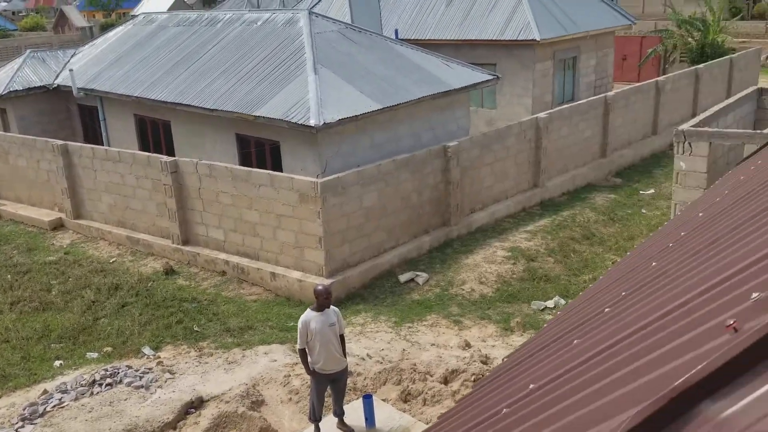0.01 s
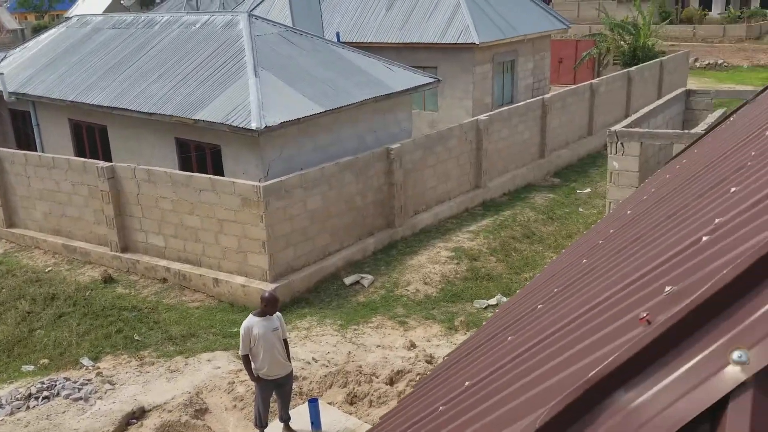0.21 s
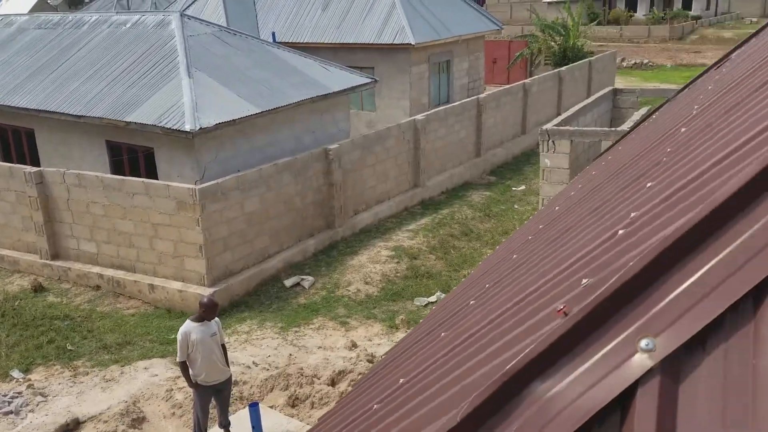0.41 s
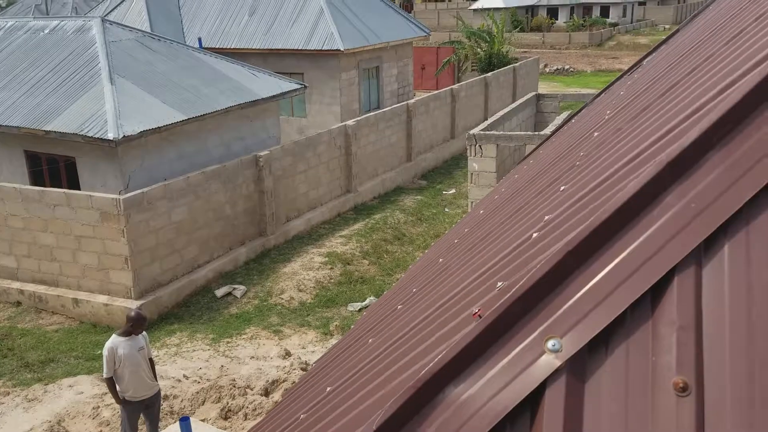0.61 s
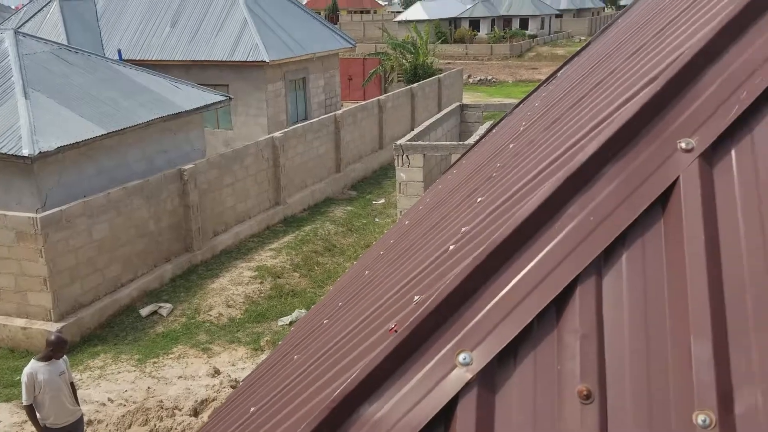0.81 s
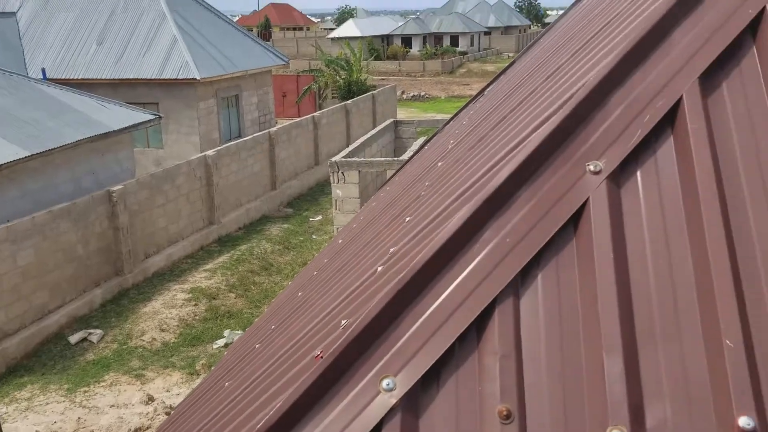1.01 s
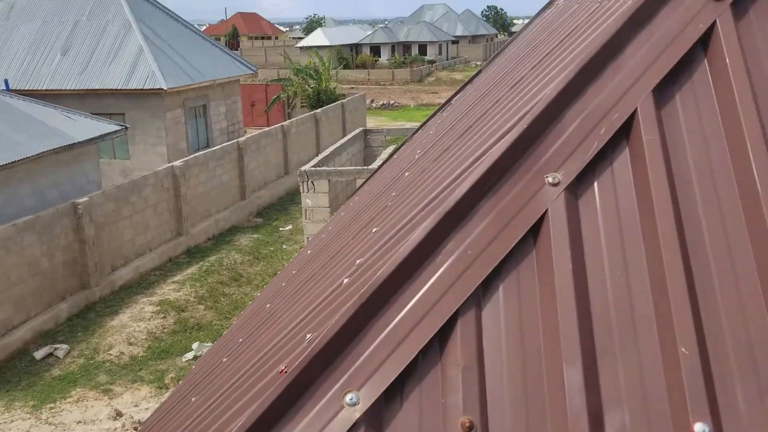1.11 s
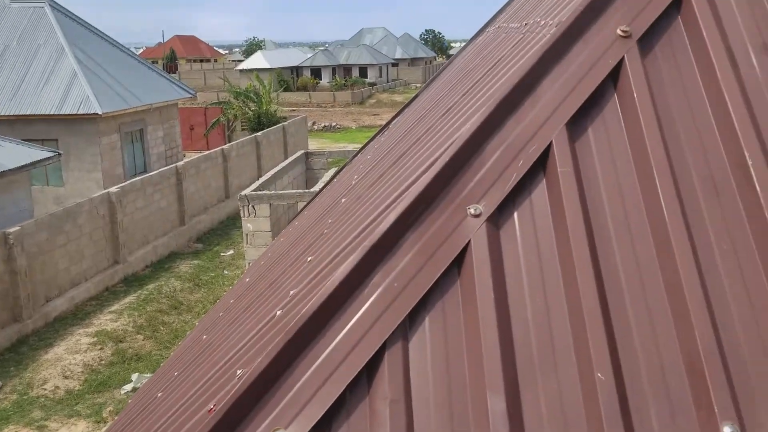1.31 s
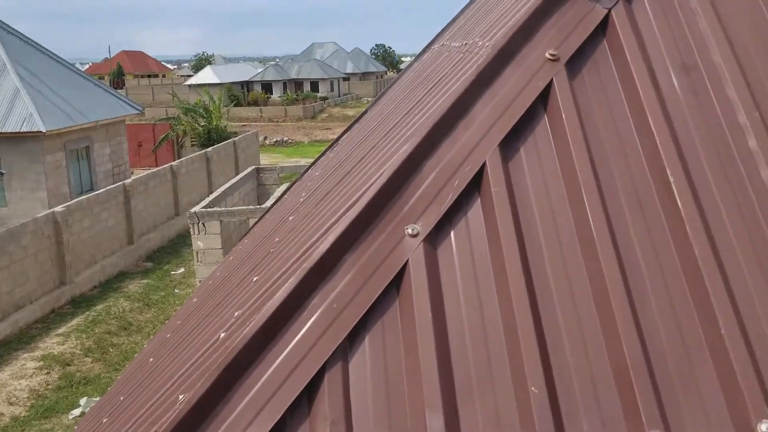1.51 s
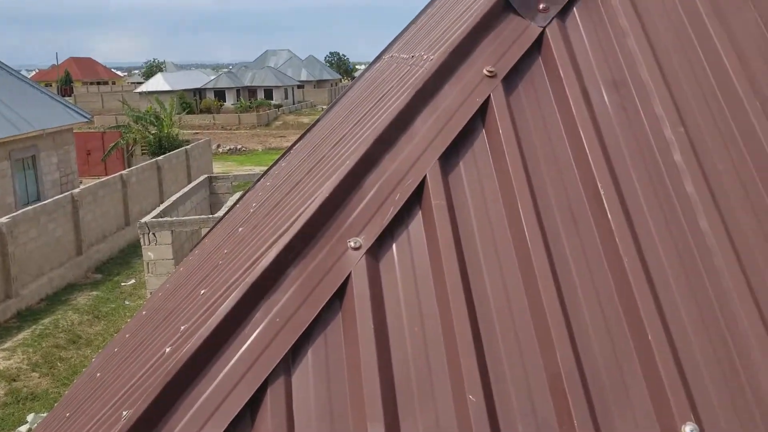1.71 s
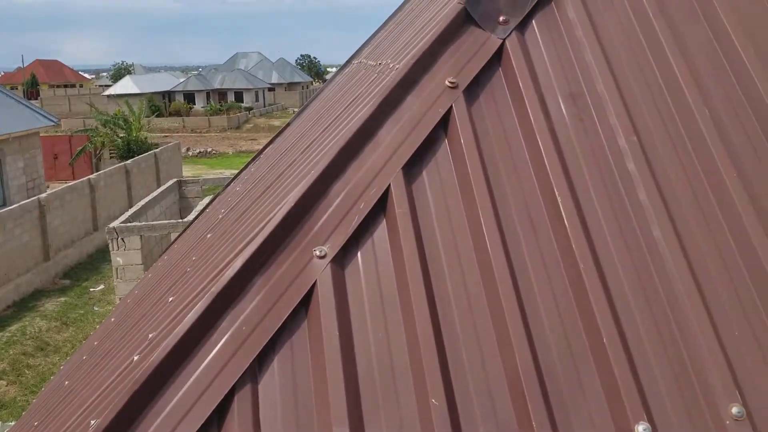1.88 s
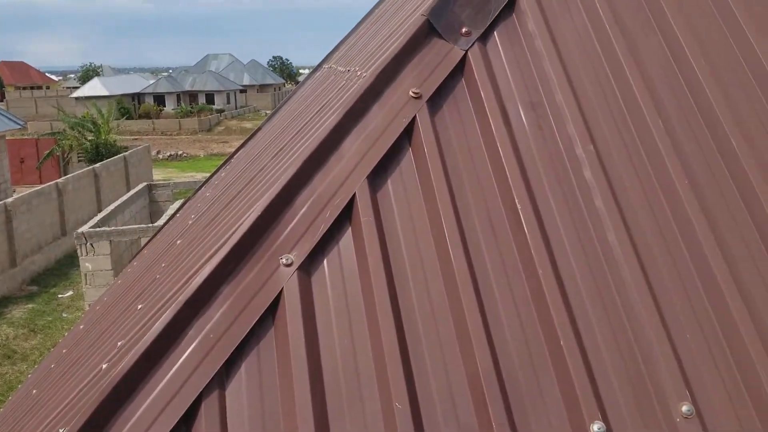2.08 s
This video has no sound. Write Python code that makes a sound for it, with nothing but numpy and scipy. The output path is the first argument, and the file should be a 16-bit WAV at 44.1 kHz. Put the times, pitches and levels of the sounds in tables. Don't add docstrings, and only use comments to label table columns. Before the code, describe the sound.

Four slow treads bang on a pitched sheet-metal roof, heard very close and loud in stereo; hollow booms decay into dull tails, bent metal clicks back, while a thin chirp and distant motor hum stay faint.

```python
import sys
import numpy as np
from scipy import signal
from scipy.fft import rfft, irfft
from scipy.io import wavfile
from scipy.ndimage import uniform_filter1d

SR = 44100
rng = np.random.default_rng(int(sys.argv[2]) if len(sys.argv) > 2 else 0)


def file_out(sig):
    cols = np.atleast_2d(sig).T
    lim = np.clip(cols, -1, 1)
    pcm = np.round(lim * 32767).astype(np.int16)
    wavfile.write(sys.argv[1], SR, pcm)


def elevation(decibels):
    levels = np.asarray(decibels, float)
    return 10 ** (levels / 20)


N = 92610

# freq_hz, level_db_per_hz
RUMBLE_SPECTRUM = [(15, -51), (25, -21), (64, -3.5), (97, -0.5), (134, 2), (229, -18.5), (2760, -51),
                   (6380, -65), (16000, -78)]
# time_s, level_db
HUM_SWELL = [(0, 20), (.07, -4), (.4, 4), (.49, 18), (.56, 12), (.6, -16), (.9, 1), (1.01, 15), (1.1, -15),
             (1.4, -9), (1.47, -6.5), (1.6, -6), (2.1, -5)]
RUMBLE_DB, HUM_DB, HUM_HZ, HUM_WIDTH_HZ = -39, -43, 115, 24

STEP_START_S = [
    -.3,
    .2025,
    .246,
    .7143,
    1.2288,
    1.7137,
]
# level_db, bass_db, treble_db, hold_s
STEPS = [
    (-7.5, -2.5, -1.5, 0.015),
    (-11, 3.5, 0, 0.029),
    (-14, 4, 0.5, 0.014),
    (-10, 0.5, 2, 0.025),
    (-11.5, -0.5, 1.5, 0.016),
    (-11, -2, 0.5, 0.011),
]
# freq_hz, level_db_per_hz
SHEET_SPECTRUM = [(21, -35), (35, 0), (216, -1.5), (443, -8.5), (1090, -10.5), (2400, -17.5), (5450, -22.5),
                  (6360, -36.5), (16000, -46)]
# freq_hz, t60_s
SHEET_T60 = [(50, 1.0), (160, 0.57), (420, 0.85), (1100, 0.61), (2900, 0.4), (7700, .28), (15000, 0.22)]
# freq_hz, level_under_boom_db
TAIL_SPECTRUM = [(60, -12), (300, -11), (1200, -29), (3000, -26.5), (4500, -31.5), (8000, -38),
                 (15000, -37)]
TAIL_T60_S, RISE_S, FLUTTER_DB, CRACKLE_DB = 1.64, 0.001, 0.5, 0.6
TREBLE_LAG_S_PER_OCT, TREBLE_RISE_S_PER_OCT, HOLD_SHRINK_PER_OCT = 0.00079, 0.001, 0.32
EARLY_S, EARLY_DB = 0.0074, -6.5

# freq_hz, level_db, t60_s
PANEL_MODES = [(62.6, -11, 1), (105.5, 2, 0.32), (181.3, -8, 0.88), (203, -3.5, 0.67), (269, -13, 1),
               (299.3, -2, 0.28), (380, -18, 0.17), (489, -7.5, 0.48), (796, -7, 0.21), (1168, -51, 0.27),
               (1312, -13, 0.58), (1528, -0.5, 0.11), (2470, -26, 0.16), (2530, -29.5, 0.18)]
PANELS_DB = -8

# time_s, pitch_hz, level_db
GLIDE = [(.036, 3400, -52), (.05, 3080, -58), (.066, 2930, -52), (.077, 2800, -52), (.092, 3330, -46),
         (.104, 3500, -52), (.116, 3370, -46), (.127, 2850, -55), (.158, 2050, -66)]
# start_s, length_s, start_hz, middle_hz, end_hz, level_db
BIRD_NOTES = [
    (.088, .05, 3750, 3900, 3650, -58),
    (.122, .022, 3400, 3330, 3050, -54),
    (.174, .022, 3020, 2880, 2740, -59),
    (2.088, .03, 2850, 2930, 2900, -62),
]
BIRD_DB = 7.5

BLOW_DB, BLOW_S = 7, 0.00045
REBOUNDS, REBOUND_DB, REBOUND_S = 14, -13.5, 0.12

# start_s, level_db, pitch_hz, t60_s, rustle_db
POPS = [
    (.226, -6.5, 845, 0.0087, -5.5),
    (0.364, -4.5, 670, 0.01, -31),
    (.739, -16.5, 987, 0.032, -6),
    (1.239, -6, 1068, 0.05, -12),
    (1.7145, -13.5, 1050, 0.065, -6),
    (2.0231, -16.5, 791, 0.019, -13),
]

# freq_hz, side_minus_mid_db
SIDE_MINUS_MID = [(60, -18), (200, -22), (400, -14.5), (800, -4.5), (1500, -4.5), (3000, 1), (15000, 1)]
# freq_hz, left_minus_right_db
LEFT_MINUS_RIGHT = [(60, -0.5), (300, 2), (1000, 1.5), (2500, 8), (5000, 3.5), (9000, 1.5), (15000, 3.5)]
# freq_hz, gain_db
PHONE_RESPONSE = [(22, -8.5), (45, -12), (60, 0.14), (2500, 4), (3120, 0), (3380, -5), (8200, -7.5),
                  (10500, 3)]
LEFT_LAG_S, LIMIT, TOP_HZ = 0.00012, 1.04, 15720


def at(table, hz):
    table = np.array(table)
    return np.interp(np.log(hz), np.log(table[:, 0]), table[:, 1])


def level(x, db):
    return x * elevation(db) / np.sqrt(np.mean(x ** 2))


def walk(rate_hz):
    hold = int(SR / rate_hz)
    held = rng.standard_normal(N // 100)[np.arange(N) // hold]
    return 1.38 * uniform_filter1d(uniform_filter1d(held, hold), hold)


def fade(t, t60_s):
    return np.exp(-2 * np.log(1000) * np.maximum(t, 0) / max(t60_s, 0.01))


def ramp(u):
    return np.sin(np.pi / 2 * np.clip(u, 0, 1)) ** 4


def place(mid, side, hz):
    side = side * elevation(at(SIDE_MINUS_MID, hz))
    lean = elevation(at(LEFT_MINUS_RIGHT, hz) / 2)
    return np.array([(mid + side) * lean, (mid - side) / lean]) / np.cosh(np.log(lean))


def third_octaves():
    octave = np.log2(np.maximum(np.fft.rfftfreq(N, 1 / SR), 1))
    noise = rfft(rng.standard_normal((2, N)))
    for hz in 25 * 2 ** (np.arange(29) / 3):
        window = np.cos(np.pi / 2 * np.clip(3 * (octave - np.log2(hz)), -1, 1))
        mid, side = irfft(noise * window, N)
        yield hz, place(mid, side, hz)


def town(t):
    rumble = sum(band * elevation(at(RUMBLE_SPECTRUM, hz) + 2.0 * walk(7.9)) for hz, band in third_octaves())
    hum_hz = HUM_HZ * (1 + 0.047 * walk(15))
    hum = elevation(5.0 * walk(HUM_WIDTH_HZ)) * np.sin(2 * np.pi * np.cumsum(hum_hz) / SR)
    swell_db = np.interp(t, *np.array(HUM_SWELL).T)
    return level(rumble, RUMBLE_DB) + level(hum, HUM_DB) * elevation(swell_db)


def step_power(t, start_s, step, hz):
    db, bass_db, treble_db, hold_s = step
    octaves = np.log2(hz / 600)
    above = max(octaves, 0)
    u = t - start_s - TREBLE_LAG_S_PER_OCT * above
    early_db = EARLY_DB - 6.7 * max(-octaves, 0) - 6.9 * max(octaves - 2.8, 0)
    early = elevation(2 * early_db) * ramp((u + EARLY_S) / 0.0037)
    rise_s = RISE_S + 0.52 / hz + TREBLE_RISE_S_PER_OCT * above
    rise = early + ramp(u / rise_s + 0.32)
    tilt_db = treble_db * octaves / 2 if octaves > 0 else -bass_db * octaves / 2
    t60_s = at(SHEET_T60, hz) * (max(hold_s, 0.005) / 0.053) ** 0.1
    held_s = hold_s * HOLD_SHRINK_PER_OCT ** max(octaves - 2.5, 0)
    tail = elevation(2 * at(TAIL_SPECTRUM, hz)) * fade(u, TAIL_T60_S)
    return elevation(2 * (db + tilt_db)) * rise * (fade(u - held_s, t60_s) + tail)


def boom(t):
    out, rattle, grit = 0, walk(34.64), walk(350)
    coarse = t[::16]
    for hz, band in third_octaves():
        power = sum(step_power(coarse, s, step, hz) for s, step in zip(STEP_START_S, STEPS))
        envelope = np.interp(t, coarse, np.sqrt(power))
        crackle_db = CRACKLE_DB * max(np.log2(hz / 600) - 1.8, 0) * grit
        flicker_db = FLUTTER_DB * rattle + 0.5 * walk(14) + crackle_db
        out = out + band * envelope * elevation(at(SHEET_SPECTRUM, hz) + 11.5 + flicker_db)
    return out


def panels(t):
    out = np.zeros((2, N))
    chance = rng.standard_normal((len(STEPS), 4, len(PANEL_MODES)))
    for s, (db, *_), (detune, size, phase, side) in zip(STEP_START_S, STEPS, chance):
        u = np.maximum(t - s + 0.0018, 0)
        for k, (hz, mode_db, t60_s) in enumerate(PANEL_MODES):
            angle = 2 * np.pi * hz * (1 + 0.0123 * detune[k]) * u + 3 * phase[k]
            env = elevation(db + PANELS_DB + mode_db + 2 * size[k]) * np.sqrt(fade(u, t60_s))
            env = env * np.minimum(u / 0.0069, 1) ** 2
            out += place(env * np.sin(angle), env * np.cos(angle) * np.tanh(side[k]), hz)
    return out


def bird(t):
    def smooth(v):
        return uniform_filter1d(v, size=220)

    s, hz, db = np.array(GLIDE).T
    gate = smooth(1.0 * (t > s[0]) * (t < s[-1]))
    glide_hz, glide_db = smooth(np.interp(t, s, hz)), smooth(np.interp(t, s, db))
    out = gate * elevation(glide_db + 2.5 * walk(140)) * np.sin(2 * np.pi * np.cumsum(glide_hz) / SR)
    for s, length_s, a_hz, b_hz, c_hz, db in BIRD_NOTES:
        u = np.clip((t - s) / length_s, 0, 1)
        hz = a_hz * (1 - u) * (1 - 2 * u) + 4 * b_hz * u * (1 - u) + c_hz * u * (2 * u - 1)
        env = elevation(db + 3 * walk(140)) * np.sin(np.pi * u)
        out = out + env * np.sin(2 * np.pi * np.cumsum(hz) / SR)
    echoes = rng.standard_normal((2, 4000)) * np.sqrt(fade(t[:4000], 0.12))
    wet = elevation(-35) * signal.fftconvolve(out[None], echoes, axes=1)[:, :N]
    return elevation(BIRD_DB) * (out * np.array([[1.6], [1.2]]) + wet)


def blows(t):
    v = (t[:600] - t[300]) / BLOW_S
    dip = -np.exp(-v ** 2)
    dip = dip + 0.38 * np.exp(-((v - 2.4) / 0.71) ** 2) + 0.55 * np.exp(-((v + 4.4) / 0.5) ** 2)
    hits = np.zeros((2, N))
    chance = rng.random((len(STEPS), 4, REBOUNDS))
    for s, (db, *_), (when, size, sign, side) in zip(STEP_START_S[1:], STEPS[1:], chance):
        hits[:, int(s * SR)] = elevation(db + BLOW_DB) * np.array([1.2, 0.85])
        late_s = 0.00372 + REBOUND_S * when
        gain = elevation(db + BLOW_DB + REBOUND_DB - 14 * size - 25 * late_s) * np.sign(sign - 0.5)
        pan = np.array([0.76 + 1.5 * side, 1.1 - 0.2 * side])
        hits[:, ((s + late_s) * SR).astype(int)] = gain * pan
    return signal.fftconvolve(hits, dip[None], axes=1)[:, 300:N + 300]


def pops(t):
    out = 0
    overtones = [(0.7, 0.29), (1.0, 1), (1.3, 0.17), (1.65, 0.24), (2.15, 0.2)]
    rustle_band = signal.butter(2, [550, 1400], "band", fs=SR, output="sos")
    for s, db, hz, t60_s, rustle_db in POPS:
        u = np.maximum(t - s, 0)
        ring = sum(gain * np.sin(2 * np.pi * hz * ratio * u) for ratio, gain in overtones)
        ring = ring * np.sqrt(fade(u, t60_s)) * np.sin(np.pi / 2 * np.minimum(u / 0.00054, 1)) ** 2
        noise = rng.standard_normal((2, N)) * np.sqrt(fade(u, 0.23)) * np.minimum(u / 0.0018, 1)
        rustle = signal.sosfilt(rustle_band, noise * elevation(0.5 * walk(90)))
        out = out + elevation(db) * (ring * np.array([[1.1], [0.9]]) + elevation(rustle_db + 11.5) * rustle)
    return out


def scene():
    t = np.arange(N) / SR
    return town(t) + boom(t) + panels(t) + bird(t) + blows(t) + pops(t)


def top_cut(x):
    return signal.sosfilt(signal.butter(12, 16650, fs=SR, output="sos"), x)


def record(dry):
    f = np.maximum(np.fft.rfftfreq(2 * N, 1 / SR), 1)
    lag = np.exp(-2j * np.pi * f * LEFT_LAG_S * np.array([[0.5], [-0.5]]))
    heard = irfft(rfft(dry, 2 * N) * elevation(at(PHONE_RESPONSE, f)) * lag, 2 * N)[:, :N]
    soft = LIMIT * np.tanh(heard / LIMIT)
    cut = signal.sosfilt(signal.ellip(12, 0.3, 60, TOP_HZ, fs=SR, output="sos"), soft)
    return top_cut(np.clip(cut, -1, 1))


dry = scene()
out = record(dry)
file_out(out)
```